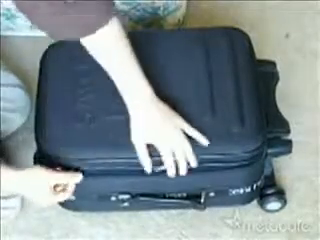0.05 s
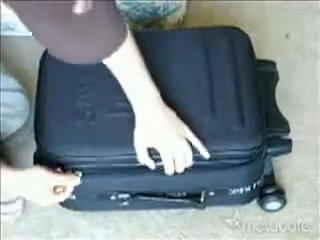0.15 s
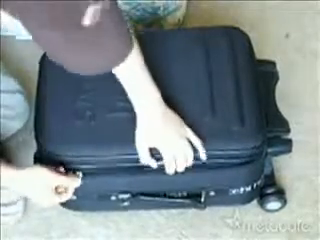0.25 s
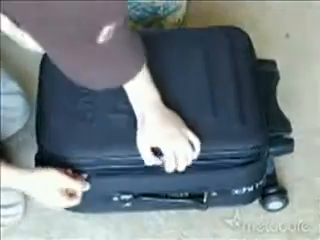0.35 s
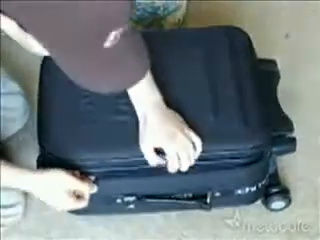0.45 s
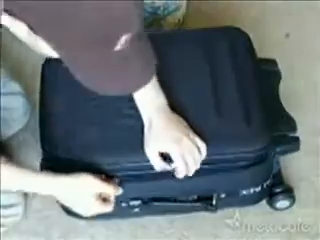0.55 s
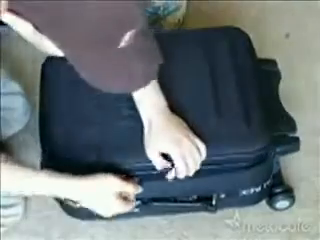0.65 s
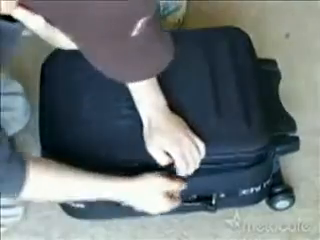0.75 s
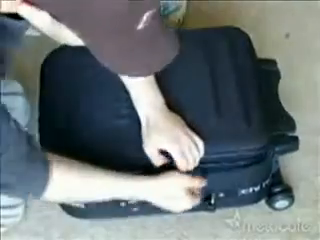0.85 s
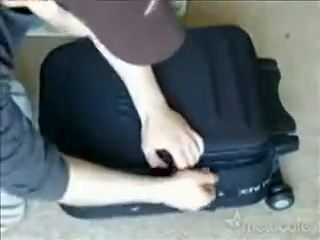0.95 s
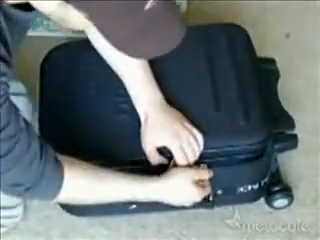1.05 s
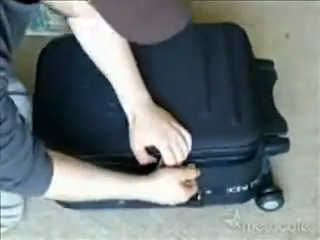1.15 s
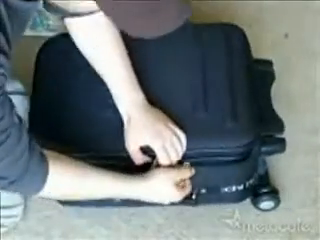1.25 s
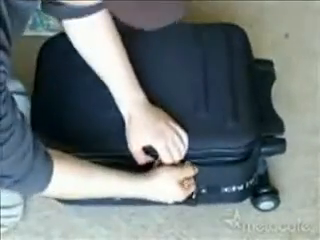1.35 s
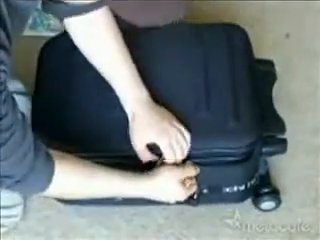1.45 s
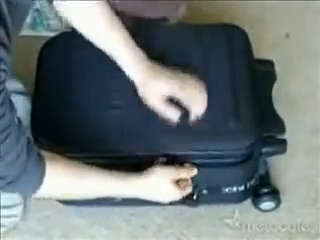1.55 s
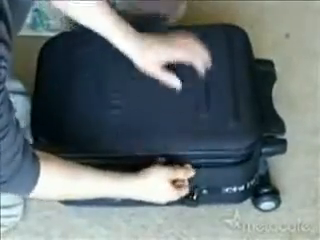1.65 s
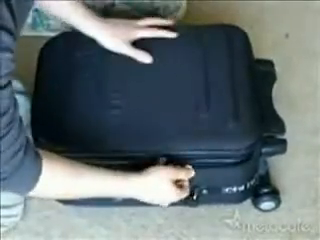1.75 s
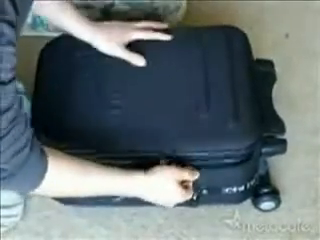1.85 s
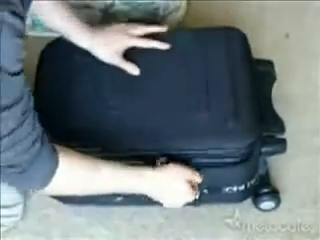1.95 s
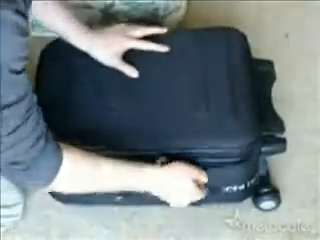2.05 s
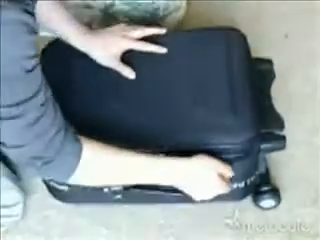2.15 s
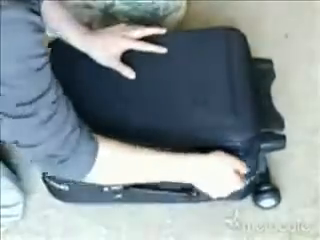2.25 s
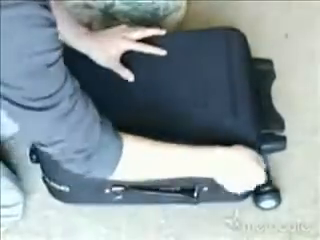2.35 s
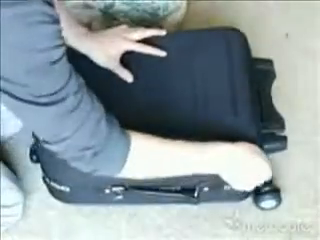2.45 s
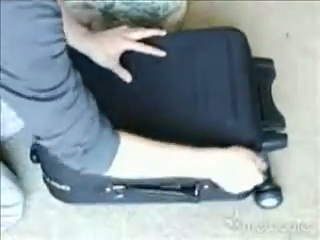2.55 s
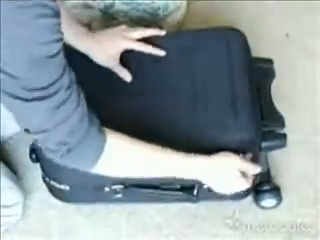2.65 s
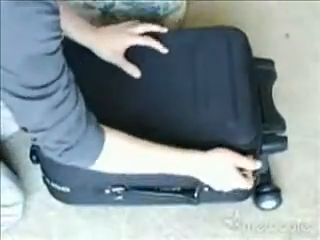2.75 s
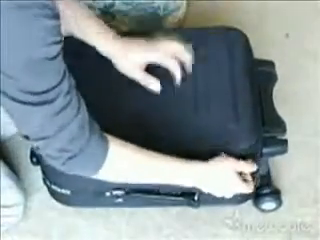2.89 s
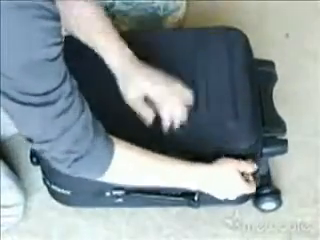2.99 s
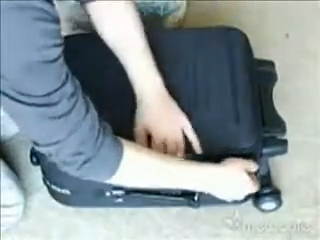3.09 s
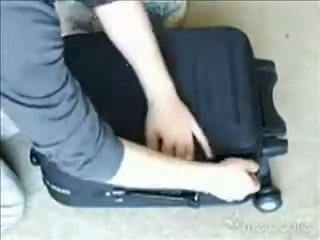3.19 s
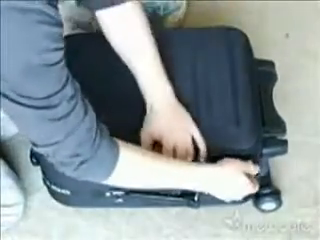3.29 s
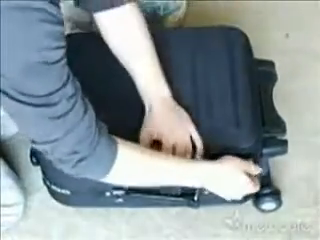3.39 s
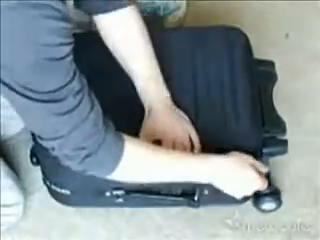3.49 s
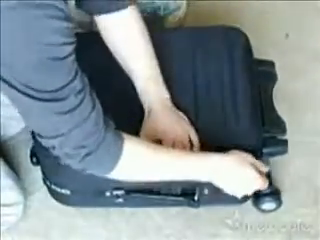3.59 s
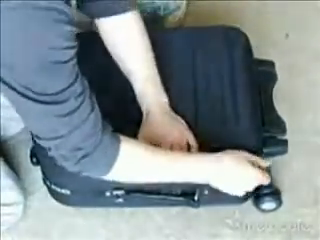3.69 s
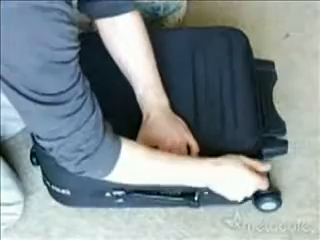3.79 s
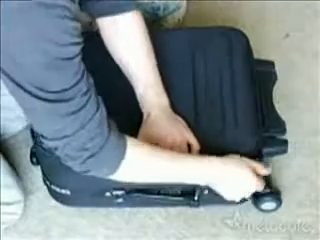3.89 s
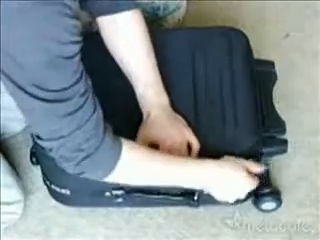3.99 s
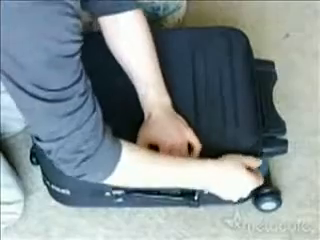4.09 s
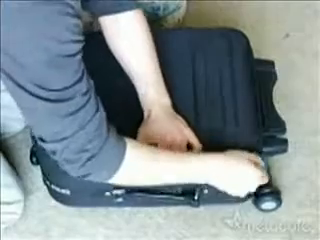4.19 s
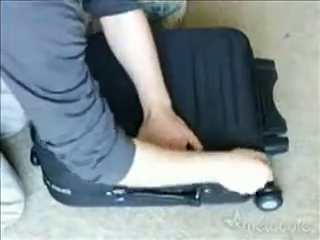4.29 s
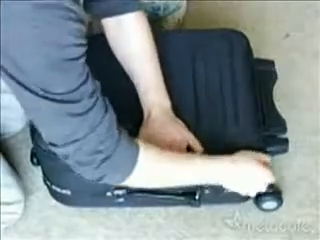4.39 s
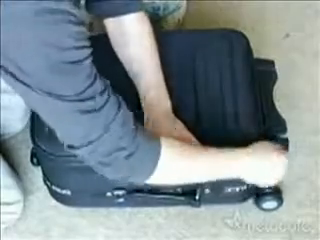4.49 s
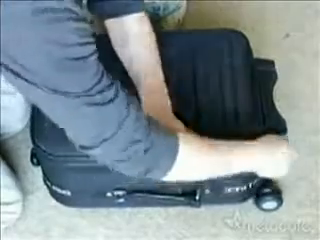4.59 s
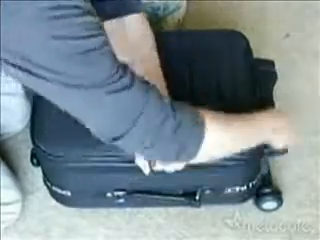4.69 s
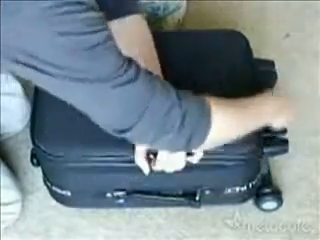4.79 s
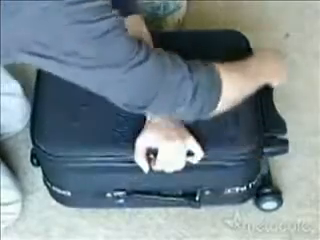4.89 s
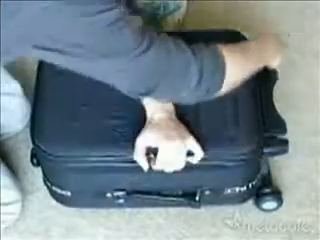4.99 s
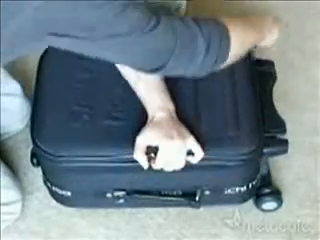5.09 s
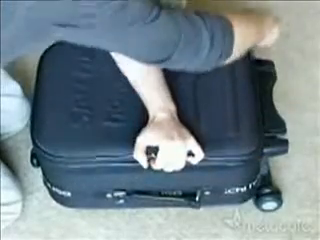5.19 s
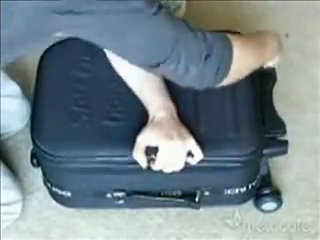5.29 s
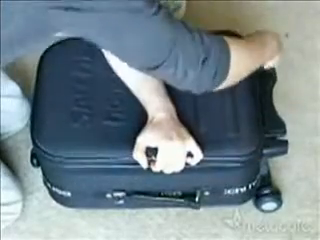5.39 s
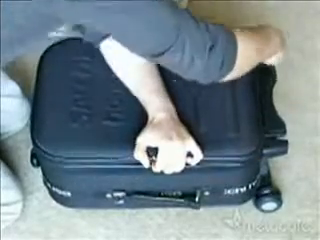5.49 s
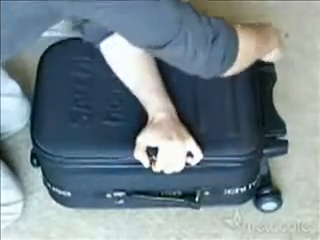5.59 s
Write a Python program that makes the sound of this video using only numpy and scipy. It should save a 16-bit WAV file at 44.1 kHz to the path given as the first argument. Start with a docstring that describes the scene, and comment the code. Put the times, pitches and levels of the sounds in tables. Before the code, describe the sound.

Three buzzing zipper pulls run along a hollow soft suitcase, separated by small clicks and rustling sleeves.

```python
"""Zipping a soft suitcase

A slider is pulled along the zip in three strokes, in a small quiet room. Each tooth knocks the
slider and shakes the hollow case, and the strained zip tape makes the case ring at a corner.
Between strokes the pull tab clicks and cloth rustles. A low drone dies away early on.
A cheap microphone adds hum, hiss and an offset (a steady shift of the wave away from zero)."""
import sys
import numpy as np
from scipy import signal
from scipy.fft import rfft, irfft, next_fast_len
from scipy.io import wavfile
from scipy.ndimage import uniform_filter1d

SR = 44100
rng = np.random.default_rng(int(sys.argv[2]) if len(sys.argv) > 2 else 0)


def log_audio(samples):
    """Write samples as a 16-bit WAV file to the path given in sys.argv[1]."""
    # one column per channel
    frames = np.atleast_2d(samples).T
    # limit to full scale, then quantise
    limited = np.clip(frames, -1, 1)
    pcm = np.round(limited * 32767).astype(np.int16)
    wavfile.write(sys.argv[1], SR, pcm)


N = 248724

# The notes at which the hollow case rings; each stretch of the zip drives them differently.
# Each row: pitch in Hz, width in Hz, then the level in dB for strokes 1, 2 and 3.
CASE_NOTES = [(130.8, 14.4, -5, 4.5, -14), (186, 7.9, -17, 3, -13.5), (260.5, 17, -3, -22, -24.5),
              (358, 22.6, 0, 1, 2), (467, 137, 2.5, -1, 0.5), (702, 110, 5.5, 5, 2.5),
              (924, 114, 2, 3.5, 2.5), (1068, 54, 1, 3, 3.5), (1154, 60, -1, -5.5, 1),
              (1296, 68, -6, -8.5, -4)]
# The times in seconds at which the first and second stretches of the zip end.
STRETCH_ENDS_S = [1.7, 3.6]


def from_db(db):
    """Turn decibels into a number to multiply a sound by."""
    return 10 ** (np.asarray(db) / 20)


def rms_one(x):
    """Scale a sound so that its average level (rms) is 1."""
    return x / np.sqrt(np.mean(x ** 2) + 1e-20)


def evened(x, window_s=0.047):
    """Hold the level near 1 all along, so that a level curve alone can set the loudness."""
    return x / np.sqrt(uniform_filter1d(x ** 2, int(window_s * SR)) + 1e-12)


def wobble(step):
    """A random curve that heads for a new value every `step` samples."""
    corners = np.arange(0, N + step, step)
    return np.interp(np.arange(N), corners, rng.standard_normal(len(corners)))


def swells(rows):
    """A loudness curve that climbs to each peak and falls back; zero or negative slopes are abrupt."""
    t = np.arange(N) / SR
    power = 0
    for peak_s, db, rise, fall in rows:
        drop_db = 10 * np.where(t < peak_s, (peak_s - t) / max(rise, .01), (t - peak_s) / max(fall, .002))
        power = power + from_db(db - drop_db) ** 2
    return np.sqrt(power)


def stroke_curves(strokes, edge_s=.01):
    """Join each column's points into a curve; also give a gate, 1 during a stroke and 0 outside."""
    t = np.arange(N) / SR
    times, *columns = np.transpose(np.vstack(strokes))
    gate = 0
    for rows in strokes:
        inside_s = np.minimum(t - rows[0][0], rows[-1][0] - t)
        gate = gate + np.clip(inside_s / edge_s + .5, 0, 1)
    return [np.interp(t, times, column) for column in columns], np.minimum(gate, 1)


def butter(x, hz, kind, order=2):
    """Keep the lows, the highs or one band of a sound (a Butterworth filter)."""
    return signal.sosfilt(signal.butter(order, hz, kind, fs=SR, output="sos"), x)


def resonance(x, hz, width_hz):
    """Make a sound ring at one pitch; the narrower the width, the longer it rings."""
    r = np.exp(-np.pi * width_hz / SR)
    feedback = [1, -2 * r * np.cos(2 * np.pi * hz / SR), r * r]
    return signal.lfilter(np.array([1, 0, -1]) * (1 - r * r) / 2, feedback, x + 1e-18)


def body(x, notes, start_s=0):
    """Ring an object at all its notes at once, with levels set by the stretch of zip in hand."""
    stretch = np.searchsorted(STRETCH_ENDS_S, start_s + np.arange(len(x)) / SR)
    return sum((-1) ** k * from_db(dbs)[stretch] * resonance(x, hz, width)
               for k, (hz, width, *dbs) in enumerate(notes))


def coloured_noise(spectrum, flicker_db):
    """Noise in half-octave bands, each with its own level and its own flicker."""
    hz, db = np.transpose(spectrum)
    edges_hz = 18 * 2 ** np.arange(0, 9.6, .5)
    white = rng.standard_normal((2, N))
    out = 0
    for k, (low, high) in enumerate(zip(edges_hz, edges_hz[1:])):
        level_db = np.interp(np.log(low * high) / 2, np.log(hz), db)
        band = butter(white[k % 2], [low, high], "band")
        out = out + from_db(level_db + flicker_db * wobble(2000)) * band
    return rms_one(out)


def background(noise_db=-39, drone_hz=31.57, drone_hold_s=1.03, drone_fall_db_per_s=59):
    """Room noise and hiss, mains hum with two thin whistles, and a distant drone that dies away."""
    # The wavering hum and whistles. Each row: pitch in Hz, width in Hz, level in dB.
    tones = [(118.4, 3, -50), (183, 8, -56), (7880, 15, -58), (8120, 15, -58)]
    # The colour of the quiet room. Each row: frequency in Hz, relative level in dB.
    room_colour = [(12, -42), (20, 2.5), (86, -12), (117, -1), (152, -25), (182, 8), (213, -25), (249, -1),
                   (323, -8), (367, -7), (801, -13.5), (7890, -24.5), (9970, -56.5), (13000, -85),
                   (21900, -120)]
    hum = sum(from_db(db) * rms_one(resonance(rng.standard_normal(N), hz, width))
              for hz, width, db in tones)
    t = np.arange(N) / SR
    drone_db = -39.5 - drone_fall_db_per_s * np.maximum(t - drone_hold_s, 0)
    drone = np.sqrt(2) * np.sin(2 * np.pi * drone_hz * t)
    noise = coloured_noise(room_colour, flicker_db=1.6)
    return from_db(noise_db) * noise + hum + from_db(drone_db) * drone


def cloth_rustle(rest_swish_db=-50, rest_rub_db=-47):
    """Hands and sleeves brush the cloth, which never lies quite still; the rubbed case murmurs."""
    # Each row is one brush: time of its peak in seconds, swish level in dB, low rub level in dB,
    # then rise and fall in seconds per 10 dB.
    brushes = [(.284, -42.5, -41, 0.3, 0.6), (.56, -43.5, -40.5, -0.04, 0.86), (1.38, -42, -38, 0.6, 0.15),
               (1.684, -41, -41.5, 0.13, .04), (1.834, -32.5, -38.5, -0.08, 0.17),
               (2.13, -39, -42, 0.2, 0.96), (2.72, -60, -37.5, -1, 0.2), (2.975, -38.5, -33.5, -0.06, 0.04),
               (3.3, -43, -48, -0.06, 0.3), (3.485, -31, -44, -0.02, 0.03),
               (3.768, -26, -22, -0.0139, -0.0148), (3.844, -49, -53, -0.18, 1),
               (4.25, -37, -41, 0.47, 0.15), (4.309, -39.5, -37, -0.32, 0), (4.5, -36.5, -44, -0.25, 0.55),
               (5.29, -36.5, -45, -0.16, 0.1), (5.51, -51, -40.5, 0.1, 0.2), (5.6, -42, -43.5, 0.1, 1.5)]
    # The colour of the swish. Each row: frequency in Hz, relative level in dB.
    cloth_colour = [(710, -42), (1200, -9), (1520, -3.5), (3470, -4.5), (6210, -1.5), (8150, -7.5),
                    (9800, -32), (12700, -51), (21600, -120)]
    swish_gain = swells([(s, db, rise, fall) for s, db, _, rise, fall in brushes])
    rub_gain = swells([(s, db, rise, fall) for s, _, db, rise, fall in brushes])
    swish = np.hypot(from_db(rest_swish_db), swish_gain) * coloured_noise(cloth_colour, flicker_db=2.5)
    rub = np.hypot(from_db(rest_rub_db), rub_gain) * rms_one(body(rng.standard_normal(N), CASE_NOTES))
    return swish + rub


def tab_clicks():
    """The pull tab and fingers make a sharp click, a fading rattle and a knock on the case."""
    # Each row: start in seconds, click peak in dB, pitch in Hz, broad crack in dB next to the pitched
    # part, case knock in dB, rattle in dB next to the click, rattle fade time in seconds.
    clicks = [(0.258, -27, 6630, -16, -30, -6, 0.018), (0.277, -17.5, 6000, -13.5, -22.5, -4, 0.012),
              (0.534, -25.5, 2630, -7, -32, -1, 0.02), (0.5812, -11, 2330, 7, -23, -18, .01),
              (1.7275, -19, 6200, -20, -35, -22, .012), (2.043, -27, 5860, -24, -46, -6, .014),
              (2.582, -30, 1980, -20, -38, -14, 0.01), (2.97, -21.5, 2830, -5, -38, 1, 0.029),
              (3.288, -19, 6000, -19.5, -45, -9, 0.011), (3.479, -16.5, 2070, -11, -25, -5, 0.011),
              (3.739, -34, 6150, -22, -25, 2, 0.035), (3.7672, -1.5, 2890, -2, -10.5, -11.5, 0.027),
              (3.8377, -21.5, 6300, 1, -19.5, -3, 0.02), (4.108, -26, 6800, -12, -36, -3, 0.027),
              (4.154, -25.5, 6040, -8, -30.5, -2, 0.017), (4.172, -24, 6500, -19, -32, -14, .01),
              (4.226, -27, 1550, -10, -53, 0, 0.062), (4.307, -18.5, 2900, -4, -24, -3, 0.019)]
    out = np.zeros(N)
    t = np.arange(int(.2 * SR)) / SR
    for start_s, peak_db, hz, crack_db, knock_db, rattle_db, fade_s in clicks:
        snap = rng.standard_normal(len(t)) * t * np.exp(-t / 0.00066)
        rattle = rng.standard_normal(len(t)) * np.exp(-t / np.clip(fade_s, .003, .1))
        click, tail = [resonance(resonance(x, hz, .16 * hz), hz, .16 * hz)
                       + from_db(crack_db) * butter(x, [1500, 6800], "band") for x in (snap, rattle)]
        click, tail, snap = [x / np.abs(x).max() for x in (click, tail, snap)]
        blow = snap + 0.2 * rattle
        lid_boom = 1.13 * resonance(blow, 206, 86)
        knock = body(blow, CASE_NOTES, start_s) + lid_boom
        sound = from_db(peak_db) * (click + from_db(rattle_db) * tail)
        sound += from_db(knock_db) * knock / np.abs(knock).max()
        i = round(start_s * SR)
        out[i:i + len(t)] += sound[:N - i]
    return out


def tooth_knocks(jerk, usual_teeth_per_s=300, stumble_power=1.1):
    """One knock per tooth; a slow slider stumbles more, scattering their timing and strength."""
    # The slider's speed, one list per stroke. Each row: time in seconds, teeth per second.
    speeds = [
        [(.57, 120), (.7, 121), (.73, 225), (.77, 245), (.79, 358), (.825, 352), (.85, 388), (.92, 355),
         (1.0, 435), (1.03, 400), (1.055, 190), (1.27, 130)],
        [(2.16, 235), (2.21, 235), (2.24, 176), (2.29, 190), (2.32, 228), (2.41, 255), (2.45, 203), (2.48, 212),
         (2.505, 275), (2.63, 170)],
        [(4.46, 180), (4.66, 185), (4.75, 160), (4.79, 188), (4.87, 270), (4.92, 400), (4.96, 515), (5.04, 435),
         (5.12, 426), (5.2, 354), (5.25, 240), (5.31, 200)],
    ]
    # How uneven the knocks are at the usual speed, from 0 to 1, for strokes 1, 2 and 3.
    scatter = [.05, .09, .16]
    (teeth_per_s,), _ = stroke_curves(speeds)
    stretch = np.searchsorted(STRETCH_ENDS_S, np.arange(N) / SR)
    stumble = (usual_teeth_per_s / teeth_per_s) ** stumble_power
    uneven = np.clip(np.array(scatter)[stretch] * stumble, 0, .6)
    teeth_per_s = teeth_per_s * (1 + .045 * jerk)
    teeth_passed = np.floor(np.cumsum(teeth_per_s) / SR)
    teeth = np.flatnonzero(np.diff(teeth_passed))
    timing, strength = rng.standard_normal((len(teeth), 2)).T
    shift = (.5 * uneven[teeth] * timing * SR / teeth_per_s[teeth]).astype(int)
    knocks = np.zeros(N)
    knocks[np.clip(teeth + shift, 0, N - 1)] = from_db(10 * uneven[teeth] * strength)
    return knocks


def zipper(scratch_fade_s=0.003):
    """Each tooth knocks and scratches: the case shakes, the zip tape thrums and the slider rasps."""
    # How loud the pull is, one list per stroke. Each row: time in seconds, then the levels in dB
    # of the case, the slider's rasp and the tape's thrum.
    strokes = [
        [(0.575, -38, -43, -41), (0.579, -32, -30, -53), (0.611, -18, -27, -21.5), (0.697, -22.5, -23, -20.5),
         (0.719, -16.5, -23, -27), (0.849, -14, -19, -16.5), (0.921, -14.5, -14.5, -19.5),
         (1.003, -15, -22, -18.5), (1.043, -20, -27.5, -19.5), (1.079, -18.5, -22.5, -17),
         (1.117, -25, -33, -26), (1.149, -46, -39, -42), (1.193, -32.5, -33.5, -36.5), (1.27, -43, -48, -43)],
        [(2.17, -40, -47, -39), (2.19, -23, -35, -21), (2.212, -21.5, -31, -30), (2.23, -38, -30.5, -22.5),
         (2.264, -20.5, -34, -26), (2.298, -31.5, -33.5, -21.5), (2.362, -23.5, -28, -30),
         (2.394, -18.5, -25.5, -21), (2.464, -19.5, -24.5, -20.5), (2.508, -27.5, -38.5, -25.5),
         (2.578, -44, -47, -43), (2.586, -29, -35, -34), (2.612, -41, -48, -41), (2.63, -35, -52, -57)],
        [(4.46, -55, -45, -50), (4.474, -33.5, -41, -44), (4.512, -38, -36, -30), (4.566, -42, -53, -38.5),
         (4.612, -27.5, -33.5, -29.5), (4.664, -37, -46, -32), (4.74, -27, -38, -29.5),
         (4.778, -23.5, -22.5, -20.5), (4.908, -16.5, -14.5, -23), (4.972, -14.5, -13.5, -15),
         (5.14, -13.5, -19.5, -18), (5.152, -10.5, -15, -13.5), (5.2, -13, -14, -19.5), (5.31, -53, -42, -46.5)],
    ]
    # The slider's notes. Each row: pitch in Hz, width in Hz, then level in dB for strokes 1, 2 and 3.
    slider_notes = [(1490, 170, -0.5, 0.5, -1), (1773, 116, -1, -2, -0.5), (1956, 210, -5, -2.5, 0.5),
                    (2303, 55, 5, -1, 4), (2620, 350, -3.5, -9, -3), (3080, 180, -2, -6, 0.5),
                    (3300, 380, -4.5, -9, -5), (4100, 310, -4, -6.5, -4), (4390, 410, -5, -7.5, -5.5),
                    (5240, 760, -6, -9, -7), (5770, 700, -4, -6.5, -6), (7110, 810, -7, -10.5, -6.5),
                    (8130, 1580, -11.5, -16, -11)]
    (case_db, rasp_db, thrum_db), gate = stroke_curves(strokes, edge_s=0.0046)
    jerk = wobble(500)   # the hand pulls in small jerks
    knocks = tooth_knocks(jerk)
    fade = np.exp(-1 / (scratch_fade_s * SR))
    knock_tails = signal.lfilter([1], [1, -fade], knocks)
    scratch = rng.standard_normal(N) * (knock_tails + .4)
    shaken_case = body(knocks + .03 * scratch, CASE_NOTES)
    shaken_slider = body(scratch + 8 * knocks, slider_notes)
    lid_boom = .7 * resonance(knocks, 190, 140)
    case = from_db(case_db) * evened(butter(shaken_case, 650, "high"))
    thrum = from_db(thrum_db) * evened(butter(shaken_case + lid_boom, [130, 560], "band"))
    rasp_db = rasp_db + 1.32 * jerk   # a jerk rasps harder
    rasp = from_db(rasp_db) * evened(butter(shaken_slider, 1350, "high"))
    return gate * (case + thrum + rasp)


def corner_ring(hz=1057, width_hz=25):
    """The case rings on one note while the strained tape drags at a corner."""
    # Each row: time of the peak in seconds, level in dB, then rise and fall in seconds per 10 dB.
    drags = [(1.08, -25.5, 0.29, 0.08), (2.47, -26, 0.17, .02), (4.76, -28.5, 0.13, -2),
             (4.868, -16, 0.0846, -0.04)]
    drag = resonance(rng.standard_normal(N), hz, width_hz)
    return swells(drags) * evened(resonance(drag, hz, 3 * width_hz))


def room_echo(x, fade_60_db_s=0.25, wall_cut_hz=4700):
    """Eight echoes bounce between the walls, quieter and duller on every round."""
    size = next_fast_len(N + SR)
    one_sample_delay = np.exp(-2j * np.pi * np.arange(size // 2 + 1) / size)
    dull = np.exp(-2 * np.pi * wall_cut_hz / SR)
    wall = (1 - dull) / (1 - dull * one_sample_delay)
    lags = (rng.uniform(.006, .028, 8) * SR).astype(int)
    echoes = 0
    for k, lag in enumerate(lags):
        trip = from_db(-60 * lag / SR / fade_60_db_s) * wall * one_sample_delay ** lag
        echoes = echoes + (-1) ** k * trip / (1 - trip)   # all the round trips added up
    return irfft(rfft(x, size) * echoes, size)[:N]


def scene(echo_db=-14):
    """The zip and clicks with their echo, over the rustle and background, in one channel."""
    suitcase = zipper() + corner_ring() + tab_clicks()
    return (suitcase + from_db(echo_db) * room_echo(suitcase) + cloth_rustle() + background())[None]


def record(dry, offset=-.0097, top_hz=10270):
    """The microphone softens the treble, rounds the tallest peaks, adds an offset and cuts the top."""
    soft = butter(dry, 8420, "low", order=6)
    rounded = soft / (1 + np.abs(soft) ** 6) ** (1 / 6)
    return signal.sosfilt(signal.cheby2(16, 62, top_hz, fs=SR, output="sos"), rounded + offset)


dry = scene()
out = record(dry)
log_audio(out)
```